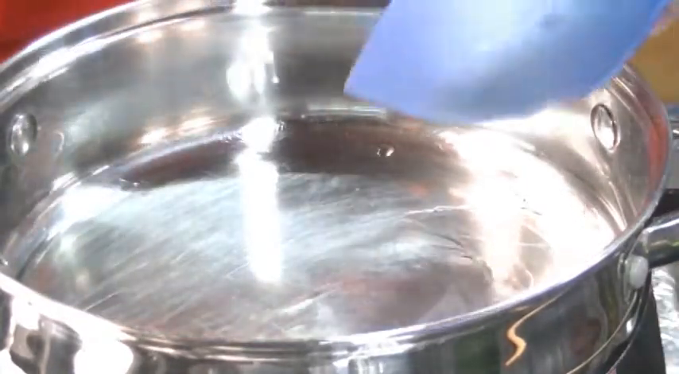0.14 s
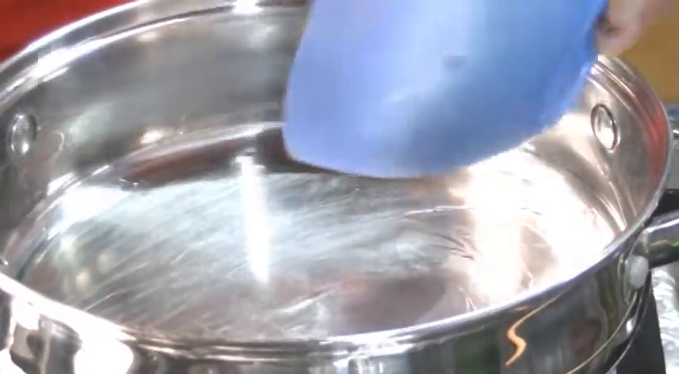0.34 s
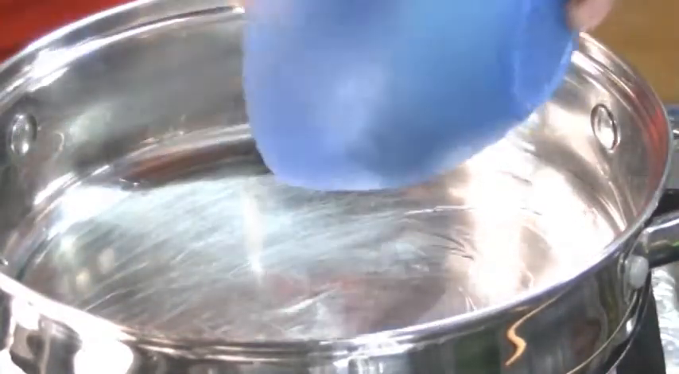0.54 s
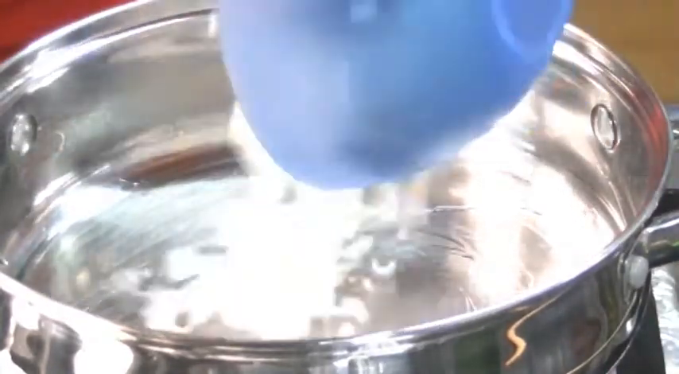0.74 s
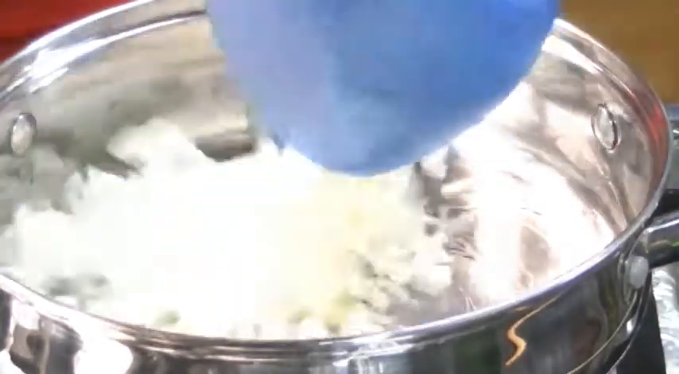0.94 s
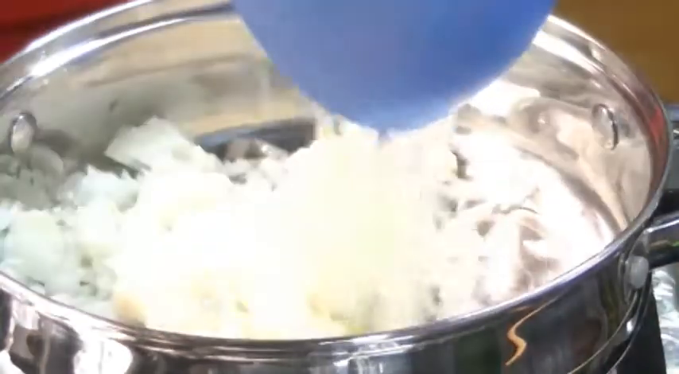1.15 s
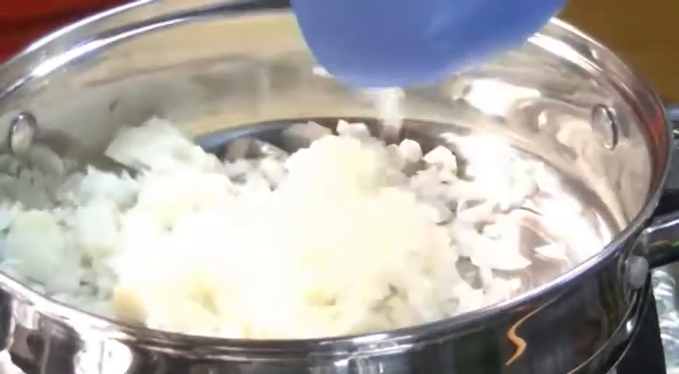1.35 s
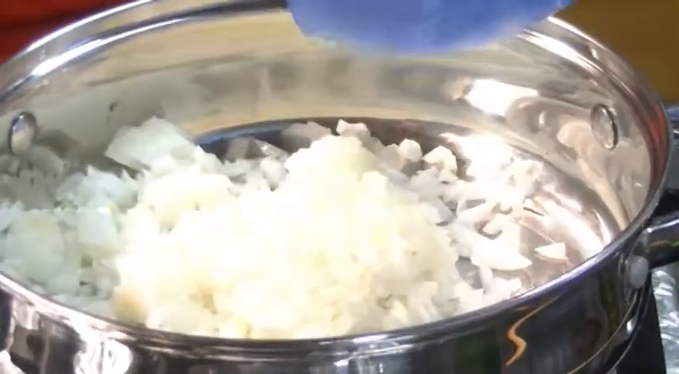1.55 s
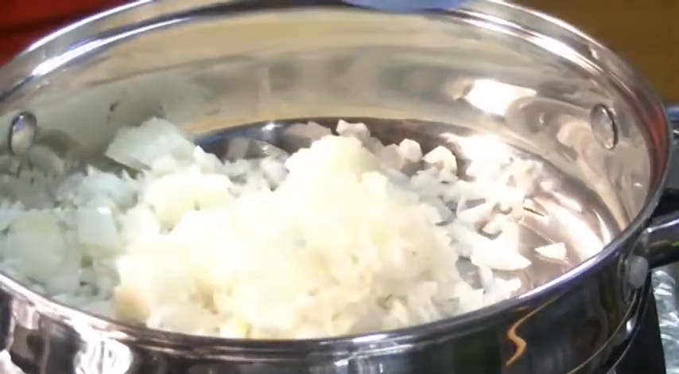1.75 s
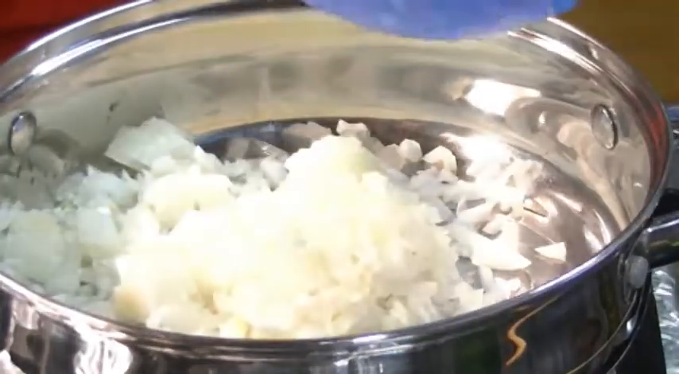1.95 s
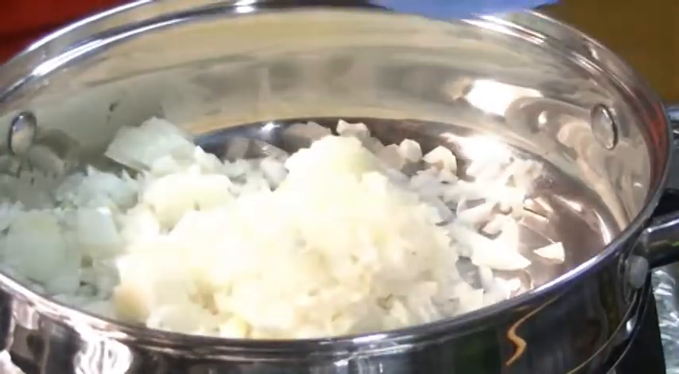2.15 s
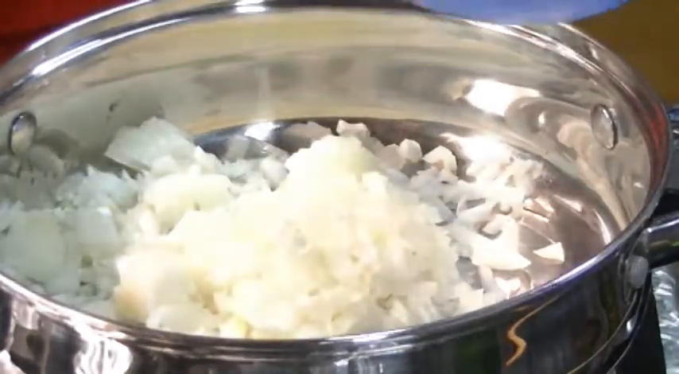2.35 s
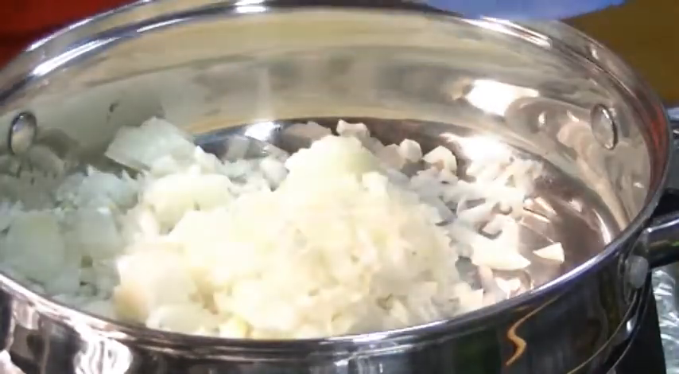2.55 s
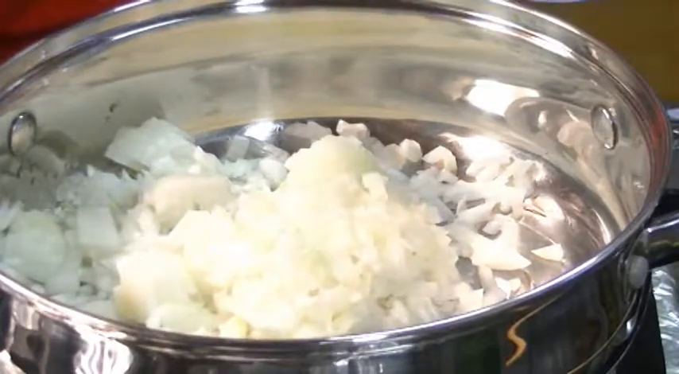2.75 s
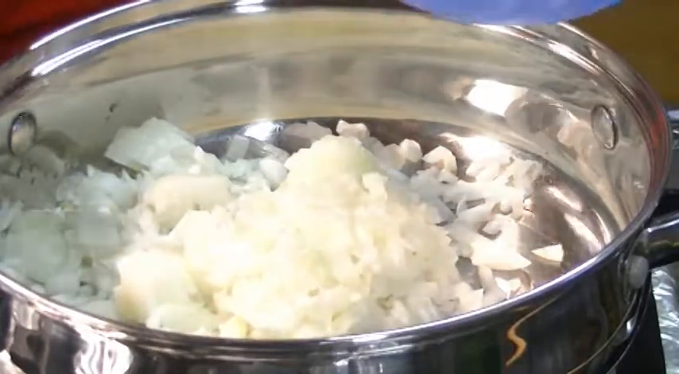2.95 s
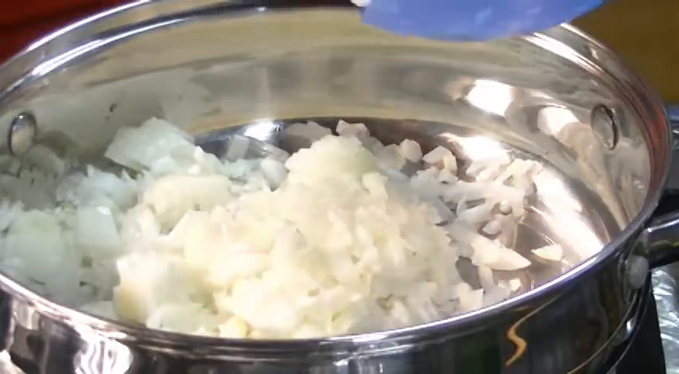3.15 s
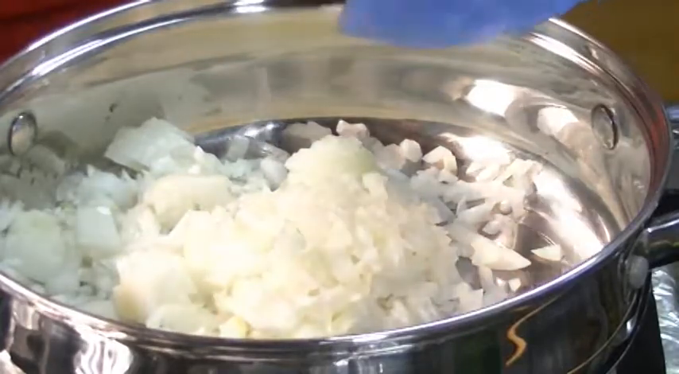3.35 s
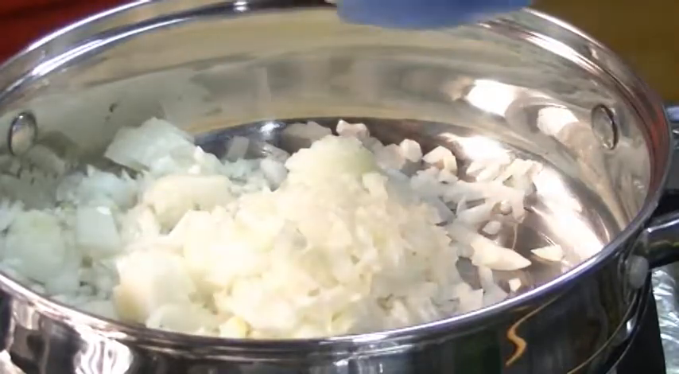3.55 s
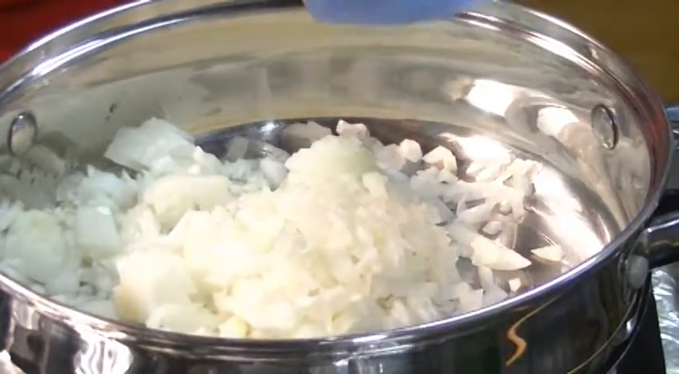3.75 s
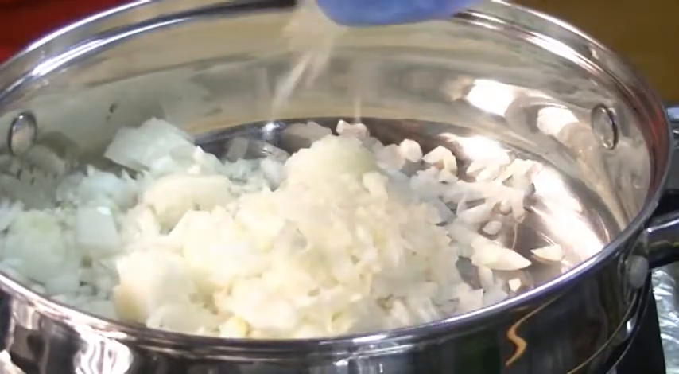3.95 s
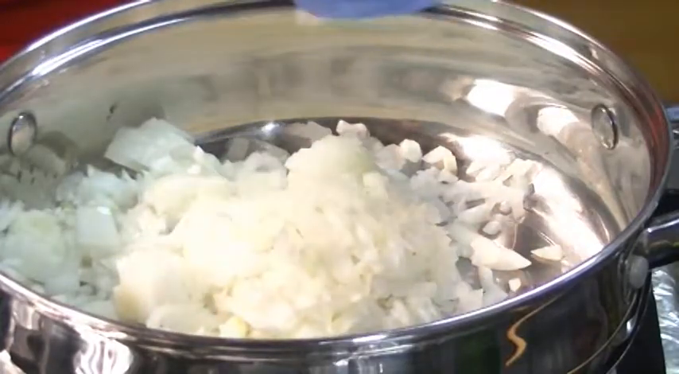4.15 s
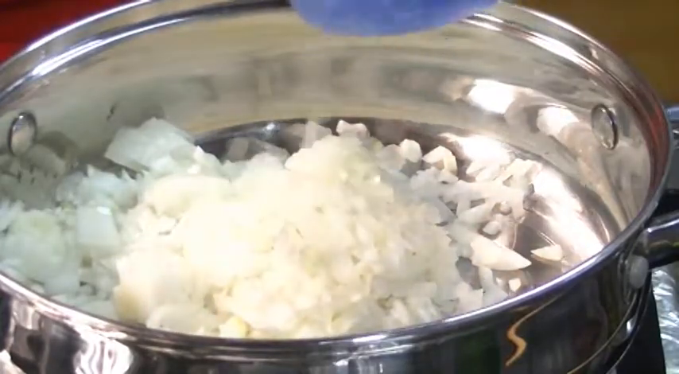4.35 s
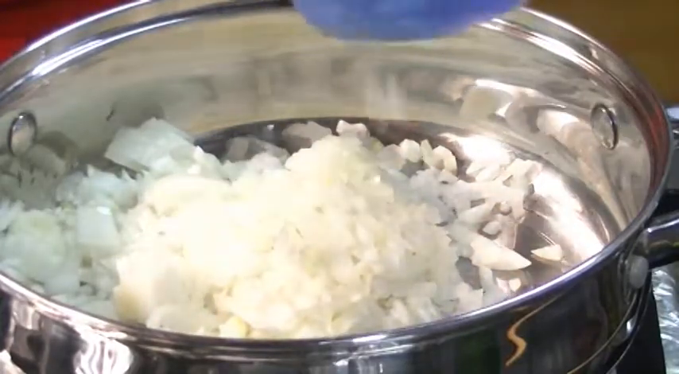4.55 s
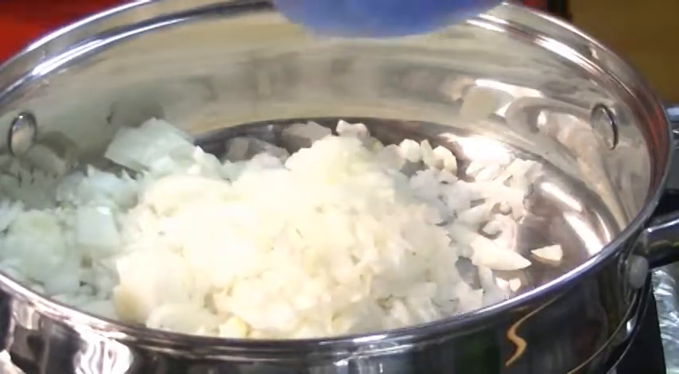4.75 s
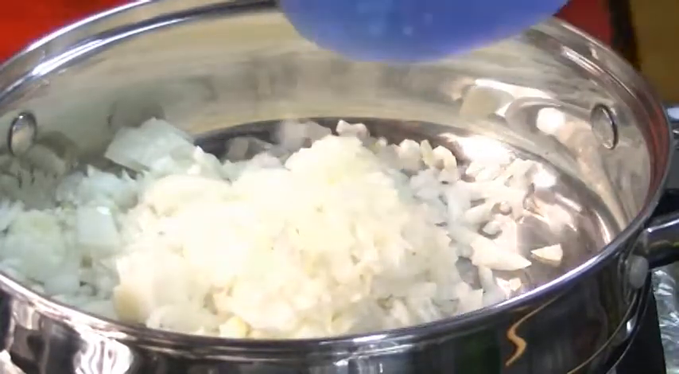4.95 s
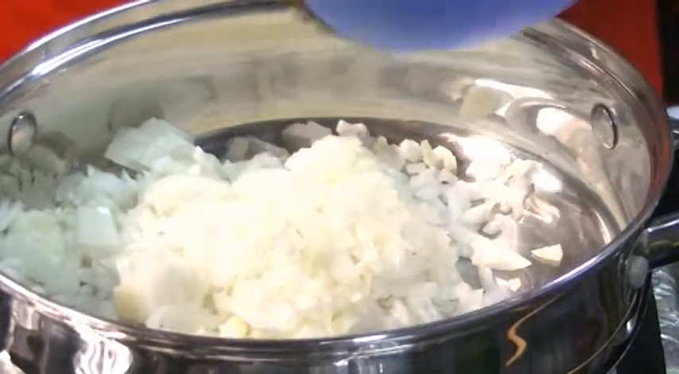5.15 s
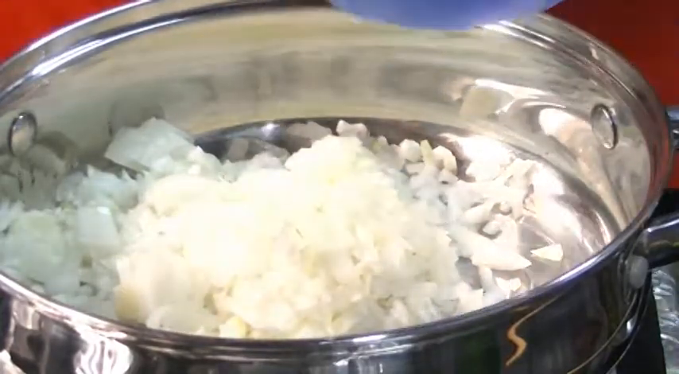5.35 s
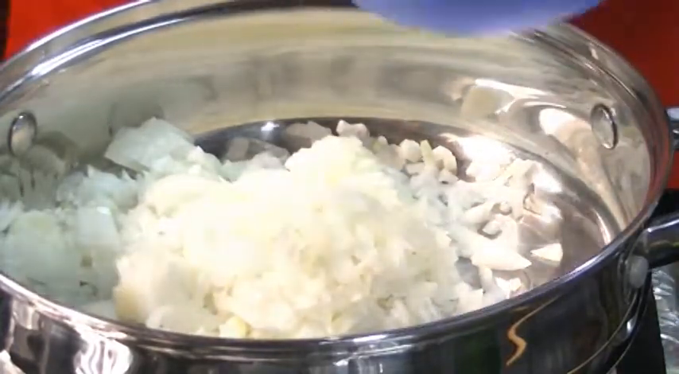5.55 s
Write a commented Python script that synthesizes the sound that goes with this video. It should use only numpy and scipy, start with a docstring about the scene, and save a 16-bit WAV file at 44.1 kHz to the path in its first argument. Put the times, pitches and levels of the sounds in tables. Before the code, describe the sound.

Over a faint kitchen hum, a hand taps a plastic bowl and diced onion slides out with a soft rustle. The pieces patter into hot oil in a steel pot, and a bright, dense sizzle swells up and carries on, dotted with sharp spits. The hand then raps the bowl again and again, making short, hollow, uneven knocks over the frying. The microphone is close to the pot, with slight room reverberation.

```python
"""Over the hum and whir of a kitchen, a hand raps a plastic bowl twice and diced onion slides out.
From about 0.75 s the dice land in hot oil, and their impacts excite the modes of the steel pot.
Their water flashes to steam: bubbles burst densely in a sizzle that lasts to the end, and some spit.
From about 2.1 s the hand raps the bowl again and again to shake out the rest, ringing the damped modes
of the plastic. A few brief hollow tones sound between 3 and 5 s. The kitchen adds a short reverberation."""
import sys
import numpy as np
from scipy import signal
from scipy.fft import rfft, irfft, next_fast_len
from scipy.io import wavfile
from scipy.ndimage import map_coordinates

SR = 44100
rng = np.random.default_rng(int(sys.argv[2]) if len(sys.argv) > 2 else 0)


def materialize(psi):
    """Save the field psi as 16-bit PCM at rate SR to the path in sys.argv[1].

    A 1-D psi becomes a single channel; in a 2-D psi each row is a channel.
    """
    bounded = np.clip(np.atleast_2d(psi).T, -1, 1)
    quanta = np.round(bounded * 32767).astype(np.int16)
    wavfile.write(sys.argv[1], SR, quanta)


N = 247515


def amp(db):
    """Amplitude ratio of a level in decibels."""
    return 10 ** (np.asarray(db) / 20)


def unit(x):
    """Normalisation to rms 1."""
    return x / np.sqrt(np.mean(x ** 2) + 1e-20)


def along(points, hz):
    """Interpolation of (Hz, value) points on a logarithmic frequency axis."""
    freqs, values = np.transpose(points)
    return np.interp(np.log(hz + 1), np.log(freqs + 1), values)


def wobble(rate):
    """Slow random modulation: a spline through `rate` Gaussian values a second."""
    knots = rng.standard_normal(int(N * rate / SR) + 4)
    return map_coordinates(knots, [np.arange(N) * rate / SR])


def bursts(rate, spread_db):
    """A Poisson process of `rate` clicks a second, rms 1; the spread makes a few of them large."""
    hit = rng.random(N) < rate / SR
    return unit(hit * rng.choice([-1, 1], N) * amp(spread_db * np.minimum(rng.exponential(size=N), 5)))


def envelope(rows, attack_s, release_s):
    """Exponential attack, hold and exponential release, summed over (start s, dB, hold s) rows."""
    t = np.arange(N) / SR
    return sum(amp(db) * np.exp(np.minimum(0, np.minimum((t - s) / attack_s, (s + hold - t) / release_s)))
               for s, db, hold in rows)


def coloured(x, spectrum, peaks=()):
    """Minimum-phase filter of unit power gain: a spectrum in dB plus resonance peaks."""
    size = next_fast_len(N + SR // 2)
    size += size % 2
    hz = np.fft.rfftfreq(size, 1 / SR)
    resonances_db = sum(lift / (1 + (2 * (hz - centre) / width) ** 2) for centre, width, lift in peaks)
    gain = unit(amp(along(spectrum, hz) + resonances_db))
    cepstrum = irfft(np.log(gain + 1e-5), size)
    cepstrum[1:size // 2] *= 2  # folding the cepstrum makes the filter causal
    cepstrum[size // 2 + 1:] = 0
    return irfft(rfft(x, size) * np.exp(rfft(cepstrum)), size)[..., :N]


# Vigour of the frying. Each row: time in seconds, level in dB.
FRYING_VIGOUR = [(.74, -97), (.8, -56), (.85, -54), (.875, -38.5), (.96, -32), (1.04, -31), (1.14, -27.5),
                 (1.27, -27.5), (1.61, -28), (1.9, -29), (2.5, -32), (2.9, -31.5), (3.82, -33), (4.3, -31),
                 (4.56, -31.5), (4.81, -33), (5.61, -33)]
# Spectra of small bubbles (fizz) and large ones (body). Each row: frequency in Hz, relative level in dB.
FIZZ_SPECTRUM = [(3530, -42.5), (6000, -14), (6320, -11.5), (7200, -35), (8400, -6.5), (10200, 0),
                 (13000, -7), (15100, -17), (15800, -11)]
BODY_SPECTRUM = [(150, -60), (250, -27), (623, -12.5), (764, -13.5), (1620, -3), (2140, -6), (2370, -6.5),
                 (4960, 3), (7120, -7.5), (8000, -2.5), (10400, -17.5), (17600, -120)]
# Resonances of the loaded pot. Each row: frequency in Hz, width in Hz, lift in dB.
LOADED_POT_MODES = [(575, 27, 7), (1627, 86, 8.5), (2117, 170, 10.5), (2580, 108, 8.5), (3220, 290, 6),
                    (4030, 680, 4)]
def sizzle():
    """Shot noise: steam bubbles burst over a hiss, small ones bright, large ones coloured by the pot."""
    body_db, small_spits_per_s = -7, 12
    times, levels = np.transpose(FRYING_VIGOUR)
    vigour = amp(np.interp(np.arange(N) / SR, times, levels, left=-200))
    shared = bursts(900, spread_db=3)  # these sound in both fizz and body
    surge = wobble(14)
    fizz = unit(0.7 * shared + 0.49 * bursts(2500, spread_db=0) + 0.74 * rng.standard_normal(N))
    body = unit(0.24 * shared + 0.45 * bursts(1200, spread_db=2.5) + 0.9 * rng.standard_normal(N))
    fizz += amp(-20.5) * bursts(small_spits_per_s, spread_db=3)
    body += amp(-22.5) * bursts(small_spits_per_s, spread_db=2)
    fizz *= vigour * amp(0.52 * surge + 0.41 * wobble(45))
    body *= vigour * amp(body_db + 0.8 * surge + 0.54 * wobble(29.9))
    fizz_spits, body_spits = spits()
    bright = coloured(fizz + fizz_spits, FIZZ_SPECTRUM)
    return bright + coloured(body + body_spits, BODY_SPECTRUM, LOADED_POT_MODES)


# The loudest spits of oil. Each row: start in seconds, energy in the fizz in dB, energy in the body in dB.
LOUD_SPITS = [(.9565, -14, -12), (1.122, -25, -14), (1.1481, -13, -6.5), (1.2998, 1.5, -27),
              (1.386, -4, -8), (1.6847, -2.5, -8.5), (1.759, -8, -7), (1.904, -25, -18), (2.0812, -3, -24),
              (2.1491, -4, -11), (2.4074, -30, -10), (2.4393, -20, -6.5), (2.5118, -22, -16),
              (2.586, -5.5, -23), (2.6895, 0.5, -9.5), (2.8247, 1, -13), (2.852, -25, -9),
              (3.0159, -19, -8.5), (3.2654, -3, -12.5), (3.4381, -7, -9), (3.4592, -4, -11),
              (3.7122, -6, -34), (3.7983, 0.5, -12), (4.1118, -6, -28), (4.1368, -5, -13), (4.153, -6, -30),
              (4.2212, 0.5, -22), (4.5632, -4, -7), (4.712, -3, -30), (4.9753, -5.5, -24),
              (5.006, -6.5, -30), (5.1493, -3.5, -15), (5.2279, -3, -15), (5.3601, -17, -1.5),
              (5.5311, -9, -13), (5.5763, -23, -8.5), (5.5977, -4.5, -21)]
def spits(t60_s=0.0037):
    """Impulsive excitation: each spit drives fizz and body with the same fast-decaying noise."""
    fizz, body = np.zeros((2, N))
    t = np.arange(SR // 200) / SR
    for start, fizz_db, body_db in LOUD_SPITS:
        sputter = rng.standard_normal(len(t)) * amp(-60 * t / t60_s)
        sputter /= np.linalg.norm(sputter)
        fizz[round(start * SR):][:len(t)] += amp(fizz_db) * sputter
        body[round(start * SR):][:len(t)] += amp(body_db) * sputter
    return fizz, body


# Modes of the plastic bowl. Each row: frequency in Hz, relative level in dB, 60 dB decay time in seconds.
BOWL_MODES = [(298, -10, 0.13), (415, -19.5, 0.083), (496.6, -0.5, 0.031), (583, -10, 0.051),
              (665, -3.5, 0.028), (774, -0.5, 0.025), (928, -0.5, 0.023), (1070, 7, 0.0098),
              (1225, 4, 0.0091), (1498, 3.5, 0.011), (1706, -11.5, 0.023), (1825, -6.5, 0.01),
              (2134, -5.5, 0.02), (2680, -3.5, 0.01), (3050, 0, 0.0052), (3620, 7.5, 0.0052),
              (3810, -11, 0.014), (4420, -1.5, 0.0075), (5600, 2, 0.0042)]
def bowl_ring(t, best_hz, hard_db):
    """Modal superposition: a rap favours modes near one pitch, and a hard rap adds the higher ones."""
    fall_db_per_octave, hard_hz, soft_hz = 10, 1510, 4200
    ring = 0
    for hz, db, t60 in BOWL_MODES:
        strike = amp(-fall_db_per_octave * abs(np.log2(hz / best_hz)))
        strike += amp(hard_db) / (1 + (hard_hz / hz) ** 4)
        strike /= 1 + (hz / soft_hz) ** 4  # no rap is hard enough for modes far above this
        rise = 1 - np.exp(-t * hz / 0.81)  # bending waves need part of a cycle to build up
        tone = np.sin(2 * np.pi * hz * rng.normal(1, 0.035) * t)
        decay = amp(db + rng.normal(0, 1.5) - 60 * t / t60)
        ring += strike * decay * rise * tone
    return ring


# Raps on the bowl. Each row: start in seconds, rms level of the knock's onset in dB,
# best excited pitch in Hz, hardness in dB, rattle relative to the impact in dB.
BOWL_RAPS = [(.288, -60.5, 900, 9, -26), (0.503, -38.5, 2050, -2, -52), (2.1282, -29.5, 1210, 3.5, -35),
             (2.24, -47, 1200, 6, -35), (2.5372, -29.5, 445, -2, -41), (2.895, -39, 534, -17, -31.5),
             (3.194, -26.5, 1100, -21, -34), (3.398, -45.5, 426, -5, -43), (3.447, -46, 500, -18, -21.5),
             (3.474, -38.5, 500, -14, -30.5), (3.7675, -18.5, 1200, -1.5, -48),
             (3.843, -29.5, 405, -2.5, -45), (4.1894, -25.5, 530, -7, -34.5),
             (4.478, -21.5, 533, -1.5, -34.5), (4.767, -22, 430, 3.5, -37.5),
             (4.8003, -20.5, 730, -29, -50), (5.067, -40.5, 1600, -3, -32), (5.0934, -18.5, 970, -19, -45),
             (5.478, -26, 560, -3.5, -35)]
def raps():
    """Forced vibration: the hand's impact and the loose dice drive the bowl, and skin slaps plastic."""
    onset_s, rattle_t60_s, fingers_t60_s, slap_t60_s, slap_db = 0.004, 0.27, 0.03, 0.01, -4.5
    out, t = np.zeros(N + SR), np.arange(SR // 4) / SR
    radiation = signal.butter(4, 250, "high", fs=SR, output="sos")  # the bowl is too small for bass
    skin = signal.butter(3, (222, 2000), "band", fs=SR, output="sos")
    for start, db, best_hz, hard_db, rattle_db in BOWL_RAPS:
        ring = bowl_ring(t, best_hz, hard_db)
        force = amp(rattle_db - 60 * t / rattle_t60_s) * rng.standard_normal(len(t))
        force += amp(-21 - 60 * t / fingers_t60_s) * rng.standard_normal(len(t))  # fingers land unevenly
        force[0] = 1  # the impact itself
        knock = signal.sosfilt(radiation, signal.fftconvolve(force, ring)[:len(t)])
        slap = signal.sosfilt(skin, amp(-60 * t / slap_t60_s) * rng.standard_normal(len(t)))
        knock, slap = (x / np.sqrt(np.mean(x[t < onset_s] ** 2)) for x in (knock, slap))
        out[round(start * SR):][:len(t)] += amp(db) * (knock + amp(slap_db) * slap)
    return out[:N]


# Hollow tones. Each row: time of the peak in seconds, peak level in dB, pitch in Hz, length in seconds.
HOLLOW_TONES = [(3.231, -34, 1000, .012), (3.786, -30, 960, .03), (3.806, -27, 960, .035),
                (3.9, -31, 1150, .03), (3.926, -31, 1680, .03), (3.932, -38, 3300, .035),
                (4.518, -35, 850, .03), (4.84, -27, 960, .03), (4.89, -38, 960, .02)]
def hollow_tones(lead_s=0.1):
    """Random phase modulation: faint, brief hollow tones waver in pitch as they swell and fade."""
    out, t = np.zeros(N + SR), np.arange(SR // 4) / SR
    for peak_s, db, hz, length in HOLLOW_TONES:
        swell = np.exp(-0.5 * ((t - lead_s) / (0.3 * length)) ** 2)
        phase = 2 * np.pi * hz * t + np.cumsum(rng.normal(0, 0.1, len(t)))
        out[round((peak_s - lead_s) * SR):][:len(t)] += amp(db) * swell * np.sin(phase)
    return out[:N]


# Clumps that patter and heavy lumps that plop. Each row: start in seconds, level in dB, hold in seconds.
CLUMPS = [(.764, -51, .012), (.8, -45.5, 0.074), (.892, -43, 0.061), (1.0, -46, 0.093)]
HEAVY_LUMPS = [(.77, -53, 0.018), (.805, -49.5, 0.042)]
# Resonances of the pot while empty. Each row: frequency in Hz, width in Hz, relative lift in dB.
BARE_POT_MODES = [(477, 24, -10), (640, 40, -11), (1058, 38, -3.5), (1753, 18, 7.5), (2094, 27, 3),
                  (2550, 23, -10), (3040, 18, 0), (3840, 130, -4.5), (4550, 18, -14), (5260, 36, -14)]
# Spectrum of a plop. Each row: frequency in Hz, relative level in dB.
PLOP_SPECTRUM = [(200, -24), (420, -5), (680, 0), (1100, -18), (2000, -31)]
def landing(attack_s=0.006, release_s=0.025):
    """Impact excitation: dice ring the steel bottom while their damping widens its modes; lumps plop."""
    damping, ring_db = 2.4, 22
    patter = envelope(CLUMPS, attack_s, release_s) * bursts(1800, spread_db=3)
    plop = envelope(HEAVY_LUMPS, attack_s, release_s) * bursts(700, spread_db=2)
    steel = [(hz, damping * width, db + ring_db) for hz, width, db in BARE_POT_MODES]
    patter_spectrum = [(150, -20), (500, -1.5), (3000, -5), (8000, -19)]
    return coloured(plop, PLOP_SPECTRUM) + coloured(patter, patter_spectrum, steel)


# Slips of the onion. Each row: start in seconds, level in dB, hold in seconds.
SLIPS = [(.5, -54.5, .005), (.52, -60.5, 0.19), (.765, -55.5, 0.031)]
# Spectrum of their rustle. Each row: frequency in Hz, relative level in dB.
RUSTLE_SPECTRUM = [(410, -25), (700, -9), (757, -21), (1360, -14), (1410, -18), (2690, -14), (4950, -11.5),
                   (6850, -28), (10100, -17), (15500, -32)]
def slide():
    """Friction noise: dice slip over the plastic with a grainy, uneven rustle."""
    grains = unit(bursts(2100, spread_db=5) + 1.2 * rng.standard_normal(N))
    slipping = envelope(SLIPS, attack_s=0.0093, release_s=0.017) * amp(2 * wobble(30.2))
    return coloured(slipping * grains, RUSTLE_SPECTRUM)


# Reverberation of the kitchen. Each row: frequency in Hz, 60 dB decay time in seconds.
ROOM_DECAY = [(200, 0.35), (1000, 0.46), (4000, 0.81), (12000, 0.061)]
def room(x, block_s=0.3, delay_samples=300):
    """Diffuse reverberation: each frequency dies at its own rate, in a new noise tail for each block."""
    out, step = np.zeros(N + SR), round(block_s * SR)
    for start in range(0, N, step):
        hz, t, noise = signal.stft(rng.standard_normal(SR // 2), SR, nperseg=256)
        decay = amp(-60 * t / along(ROOM_DECAY, hz)[:, None])
        _, tail = signal.istft(noise * decay, SR, nperseg=256)
        wet = signal.fftconvolve(x[start:start + step], tail / np.linalg.norm(tail))
        out[start + delay_samples:][:len(wet)] += wet
    return out[:N]


# Tones of the motors. Each row: frequency in Hz, level in dB.
MOTOR_TONES = [(58.7, -66), (118.4, -67), (161.5, -68.5)]
def motors(waver_hz=1.16, waver_depth=0.7, waver_peak_s=0.63):
    """Periodic vibration: motors hum in pure tones, the lowest under slow amplitude modulation."""
    t = np.arange(N) / SR
    lowest, *others = [amp(db) * np.sin(2 * np.pi * hz * t + 1.94) for hz, db in MOTOR_TONES]
    waver = 1 + waver_depth * np.cos(2 * np.pi * waver_hz * (t - waver_peak_s))
    return lowest * waver + sum(others)


# Spectrum of the fans. Each row: frequency in Hz, relative level in dB.
FAN_SPECTRUM = [(18, -60), (35, -10), (53, -9), (90, -15.5), (140, -6), (250, -10.5), (500, -14.5),
                (900, -20), (1800, -18), (2100, -26.5), (3500, -25), (5000, -23.5), (5800, -31.5),
                (9000, -32.5), (15800, -38)]
# Narrow whirs in it. Each row: frequency in Hz, width in Hz, lift in dB.
FAN_WHIRS = [(1130, 49, 8), (1665, 76, 6), (2610, 70, 8), (3650, 70, 5), (4400, 300, 8), (11100, 230, 10)]
def fans(level_db=-60):
    """Broadband noise with narrow peaks: the fans whir at a gently drifting level."""
    return amp(level_db + wobble(4.83)) * coloured(rng.standard_normal(N), FAN_SPECTRUM, FAN_WHIRS)


def scene():
    """Superposition: direct sound, reverberation and background add at one point near the pot."""
    raps_and_tones = raps() + hollow_tones()
    onion = sizzle() + slide() + landing()
    reverberation = room(amp(-9) * raps_and_tones + amp(-20) * onion)
    return np.tile(raps_and_tones + onion + reverberation + motors() + fans(), (2, 1))


def record(dry, top_hz=15750):
    """Band limiting of a nearly mono sound, with a faint low noise in antiphase between the channels."""
    side_spectrum = [(20, 0.5), (80, -9), (300, -18), (4000, -38), (8000, -40)]
    side = amp(-80.5) * coloured(rng.standard_normal(N), side_spectrum)
    size = next_fast_len(N + SR // 2)
    passband = np.fft.rfftfreq(size, 1 / SR) < top_hz
    return irfft(rfft(dry + [side, -side], size) * passband, size)[:, :N]


dry = scene()
out = record(dry)
materialize(out)
```